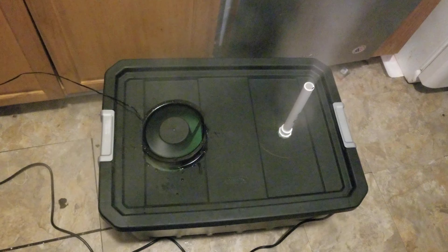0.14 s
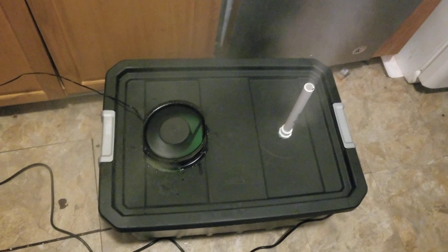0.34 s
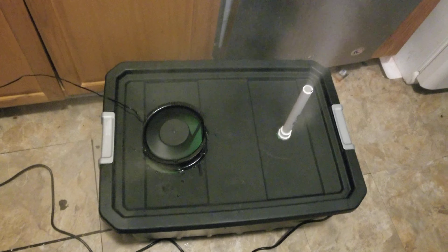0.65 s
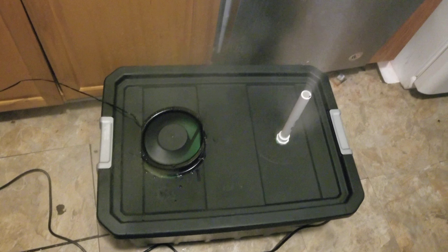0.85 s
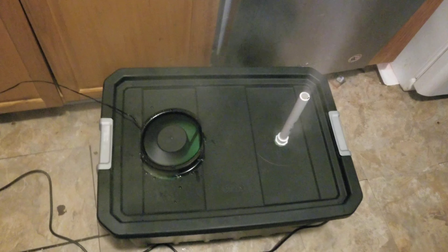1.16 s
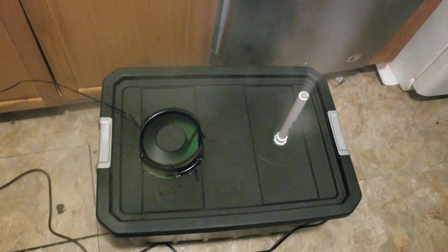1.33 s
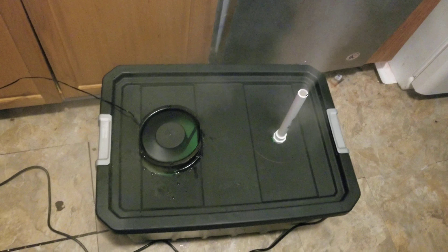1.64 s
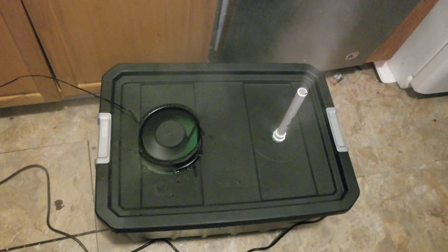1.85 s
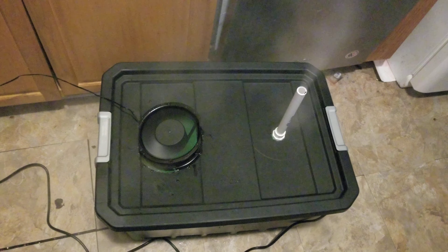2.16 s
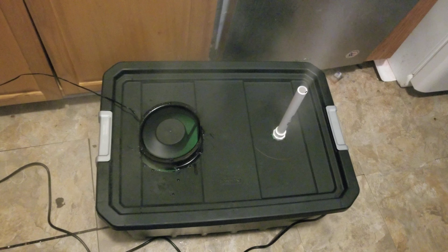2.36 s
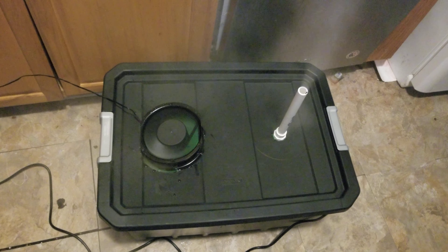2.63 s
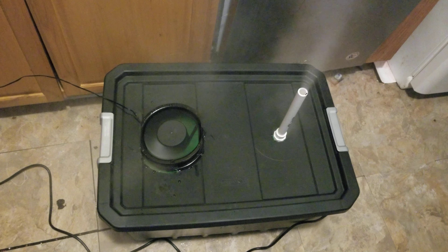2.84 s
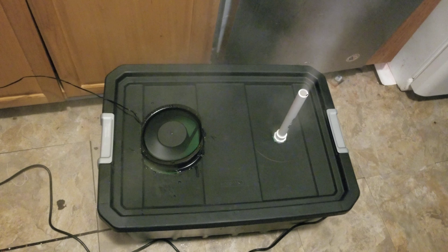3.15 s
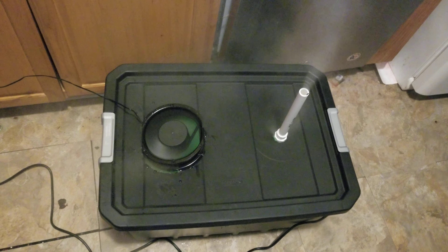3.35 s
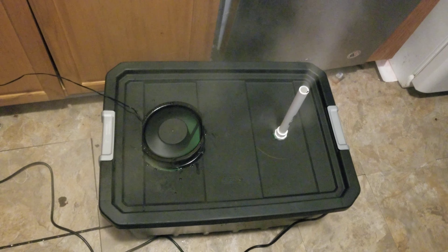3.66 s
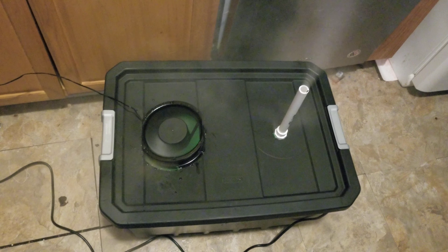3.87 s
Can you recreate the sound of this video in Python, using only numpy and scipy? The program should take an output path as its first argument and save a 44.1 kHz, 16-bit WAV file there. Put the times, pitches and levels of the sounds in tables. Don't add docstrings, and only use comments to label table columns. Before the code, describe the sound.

A small fan drones and whooshes steadily through a plastic box and pipe on a kitchen floor; after brief silence it fades in, and a sharp camera-handling crack snaps before the middle, heard by a handheld camera's microphone.

```python
import sys
import numpy as np
from scipy import signal
from scipy.fft import rfft, irfft
from scipy.io import wavfile

SR = 44100
rng = np.random.default_rng(int(sys.argv[2]) if len(sys.argv) > 2 else 0)


def output_pcm(signal):
    pcm = np.clip(np.atleast_2d(signal).T, -1, 1) * 32767
    wavfile.write(sys.argv[1], SR, np.round(pcm).astype(np.int16))


def linear_from_db(decibels):
    return 10 ** (np.asarray(decibels, float) / 20)


N = 176400


def at_hz(points, hz):
    p = np.array(points)
    return np.interp(np.log(hz + 1), np.log(p[:, 0]), p[:, 1])


def rms_one(x):
    return x / np.sqrt(np.mean(x ** 2) + 1e-20)


def closed(points):
    (low_hz, low_db), (high_hz, high_db) = points[0], points[-1]
    return [(low_hz / 2, low_db - 40)] + list(points) + [(high_hz * 1.3, high_db - 40)]


def colour(x, spectra):
    hz = np.arange(N // 2 + 1) * SR / N
    gains = [linear_from_db(at_hz(closed(s), hz)) for s in spectra]
    return irfft(rfft(x) * gains, N) * np.sqrt(SR / 2)


def drift(rate_hz):
    r = np.exp(-80 * np.pi * rate_hz / SR)
    slow = signal.lfilter([1], [1, -2 * r, r * r], rng.standard_normal(N // 40 + 2002))[2000:]
    return np.interp(np.arange(N) / 40, np.arange(len(slow)), rms_one(slow))


def ring(x, hz, t60):
    r, w = linear_from_db(-60 / (t60 * SR)), 2 * np.pi * hz / SR
    return signal.lfilter([0, np.sin(w)], [1, -2 * r * np.cos(w), r * r], x + 1e-18)


def width_t60(width_hz):
    return np.log(1000) / np.pi / width_hz


def ring_twice(x, hz, width_hz):
    t60 = width_t60(width_hz)
    return rms_one(ring(ring(x, hz, t60), hz, t60))


# pitch_hz, direct share [0-1]
DIRECT_SHARE = [(40, 1), (110, .99), (400, 1), (1200, 0.72), (1650, 0.36), (1900, 0.02), (3000, 0.17),
                (6000, 0)]


def port_noise():
    left_lead_s = 0.00011
    hz = np.arange(N // 2 + 1) * SR / N
    share = np.clip(at_hz(DIRECT_SHARE, hz), 0, 1)
    direct, left, right = rfft(rng.standard_normal((3, N)))
    late = np.exp(-2j * np.pi * hz * left_lead_s)
    direct_pair = direct * [late ** 0, late]
    return irfft(np.sqrt(share) * direct_pair + np.sqrt(1 - share) * np.array([left, right]), N)


# pitch_hz, level_db [dB per Hz]
HUM_SPECTRUM = [(60, -60), (108, -7), (120, -2), (133, -3.5), (246, -4.5), (299, -6), (354, -10),
                (680, -29)]
# pitch_hz, width_hz, level_db [rms]
BOX_RINGS = [(177, 16, -51), (212, 14, -55), (250, 16, -55), (295, 16, -50), (345, 14, -57), (392, 16, -59),
             (440, 18, -61), (477, 22, -59), (532, 18, -62), (590, 22, -66), (720, 40, -63), (830, 40, -67)]
# pitch_hz, width_hz, level_db [rms]
PIPE_RINGS = [(989, 22, -64), (1100, 40, -67), (1216, 30, -65), (1300, 30, -67), (1369, 9, -65),
              (1876, 55, -62), (2174, 40, -67), (2320, 45, -66), (2544, 60, -66), (2834, 70, -67),
              (3145, 70, -70), (5330, 110, -77), (7390, 60, -85)]
# start_s, pitch_hz, level_db
BLADE_TONE_PATH = [(0.5, 129.6, -69), (0.6, 128.9, -60), (0.69, 140.0, -56), (1.11, 142.1, -51.5),
                   (1.26, 134.3, -38.5), (1.52, 133.7, -52.5), (1.71, 127.6, -52), (1.83, 136.6, -37),
                   (1.98, 134.9, -51), (2.13, 134.2, -38.5), (2.26, 135.9, -52), (2.37, 130.7, -58),
                   (2.53, 136.8, -43), (3.16, 127.6, -49), (3.43, 141.0, -47), (3.57, 132.8, -40.5),
                   (3.69, 137.5, -56), (4.0, 131.4, -51)]
# pitch_hz, level_db [dB per Hz]
RUMBLE_SPECTRUM = [(22, -93), (50, -95), (62, -90), (70, -92.5), (88, -78.5), (108, -82.5)]


def box():
    hum = rms_one(colour(port_noise(), [HUM_SPECTRUM, HUM_SPECTRUM]))
    hum = hum * linear_from_db(-44 + 0.27 * drift(2.5)) * linear_from_db([[.3], [-.3]])

    gusts = port_noise(), port_noise()
    blade_mode = (134.5, 10, -54)
    rings = 0
    for k, (hz, width_hz, db) in enumerate([blade_mode] + list(BOX_RINGS) + list(PIPE_RINGS)):
        rings = rings + linear_from_db(db) * rms_one(ring(gusts[k % 2], hz, width_t60(width_hz)))
    rings = signal.sosfilt(signal.butter(8, 112, "high", fs=SR, output="sos"), rings)

    t = np.arange(N) / SR
    s, hz, db = np.transpose(BLADE_TONE_PATH)
    phase = 2 * np.pi * np.cumsum(np.interp(t, s, hz)) / SR
    tone = linear_from_db(np.interp(t, s, db) + 0.5 * drift(4.3)) * np.sin(phase)

    floor = port_noise() + 0.2 * rng.standard_normal((2, N))
    return hum + rings + tone + colour(floor, [RUMBLE_SPECTRUM, RUMBLE_SPECTRUM])


# pitch_hz, level_db [dB per Hz]
RUSH_LEFT = [(400, -76), (650, -83.5), (1300, -82), (1620, -91), (2100, -84), (3000, -89.5), (4300, -91),
             (8300, -108)]
# pitch_hz, level_db [dB per Hz]
RUSH_RIGHT = [(500, -82), (1300, -85.5), (1620, -87), (2100, -82), (3100, -85), (3900, -91.5), (5800, -95),
              (8000, -110)]


def air():
    rush = colour(port_noise(), [RUSH_LEFT, RUSH_RIGHT]) * linear_from_db(0.35 * drift(3.0) + 0.8 * drift(15.0))
    cavity = ring_twice(rng.standard_normal(N), hz=4650, width_hz=600)
    return rush + cavity * linear_from_db(-62 + 2.0 * drift(3.6)) * linear_from_db([[-14.], [0]])


# pitch_hz, level_db [dB per Hz]
CAMERA_LEFT = [(6000, -115), (8500, -106), (11500, -99), (13300, -97), (15500, -91), (17000, -111)]
# pitch_hz, level_db [dB per Hz]
CAMERA_RIGHT = [(6000, -118), (8500, -108), (10500, -102), (12000, -99), (13200, -108), (16000, -116)]


def camera_hiss():
    return colour(port_noise(), [CAMERA_LEFT, CAMERA_RIGHT]) * linear_from_db(0.59 * drift(24.0))


# start_s, level_db [peak], pan_db [left minus right], pitch_hz, grainy tail_s [time to fall
# 30 dB]
SHELL_TICKS = [(0.3977, -40, -7, 3150, 0.0034), (0.638, -46, -7, 3100, .005),
               (.694, -44.5, -2, 3400, 0.0067), (1.132, -47, -4, 4640, .01), (1.316, -38, -6, 4470, 0.0063),
               (1.3166, -41, -2, 2780, 0.0036), (1.317, -52, -3, 9000, 0.0018),
               (1.607, -50, -2, 5500, .004), (1.644, -43, 5, 2200, .003), (2.091, -49.5, 3, 10200, .002),
               (2.298, -51, 3, 4160, 0.007), (2.299, -44.5, 0, 3300, 0.0068), (2.452, -51, 0, 9800, .002),
               (2.452, -49, -2, 4630, .01), (2.473, -51, 3, 11400, .002), (2.485, -52, 3, 11400, .002),
               (2.5951, -44, 3, 3880, 0.0061), (2.973, -49, 8, 12000, .002), (3.059, -47, 2, 3500, 0.0074),
               (3.184, -50, -2, 4680, .01), (3.235, -52, 5, 10100, .002), (3.394, -50, -1, 4530, .015),
               (3.395, -53, 0, 10700, .002), (3.414, -45, -6, 4600, 0.061), (3.414, -54, -2, 8500, .002),
               (3.422, -50.5, 4, 10700, .003), (3.699, -45.5, -9, 4680, 0.018),
               (3.768, -51, 5, 11800, .002), (3.818, -47, -9, 5150, 0.06), (3.83, -48, 12, 14200, .003),
               (3.944, -50, 6, 11000, .003), (3.944, -45, 10, 15000, .002)]


def ticks():
    slip_s, tail_db = .002, -6
    tight_cycles, wide_cycles, wide_db = 22, 4, -2
    out, t = np.zeros((2, N + SR)), np.arange(SR // 20) / SR
    for s, db, pan_db, hz, t60 in SHELL_TICKS:
        grains = rng.standard_normal(len(t)) ** 3 + .8 * rng.standard_normal((2, len(t)))
        slip = grains * (np.exp(-t / slip_s) + linear_from_db(tail_db - 30 * t / t60))
        tight = ring(slip, hz, tight_cycles / hz)
        wide = ring(ring(slip, hz, wide_cycles / hz), hz, wide_cycles / hz)
        wide = np.diff(wide, prepend=0)
        both = tight / abs(tight).max() + linear_from_db(wide_db) * wide / abs(wide).max()
        i = int(s * SR)
        out[:, i:i + len(t)] += both * linear_from_db(db + pan_db * np.array([[.5], [-.5]]))
    return out[:, :N]


# start_s, pitch_hz, level_db [rms]
WHINE_UP = [
    (.435, 13700, -66),
    (.46, 14700, -45),
    (.48, 15200, -48),
    (.505, 15950, -58),
    (.53, 16300, -80),
]
# start_s, pitch_hz, level_db [rms]
WHINE_DOWN = [
    (0.729, 15900, -66),
    (.75, 15000, -50),
    (.772, 14500, -50),
    (.79, 13100, -72),
    (.808, 11800, -74),
]
# pitch_hz, level_db
WHINE_RIGHT_GAIN = [(11800, 4), (13200, -5), (15000, -14), (16000, -17)]


def motor_whine():
    out, t = np.zeros((2, N)), np.arange(N) / SR
    for glide in (WHINE_UP, WHINE_DOWN):
        s, hz, db = np.transpose(glide)
        pitch_hz = np.interp(t, s, hz)
        phase = 2 * np.pi * np.cumsum(pitch_hz + 160 * drift(200.0)) / SR
        level = linear_from_db(np.interp(t, s, db, left=-200, right=-200) + 2.5 * drift(80.0))
        port_gain = linear_from_db([0 * t, at_hz(WHINE_RIGHT_GAIN, pitch_hz)])
        out = out + np.sqrt(2) * level * np.sin(phase) * port_gain
    return out


# [dB per Hz, relative]
EFFORT_LEFT = [(2500, -16), (3300, 0), (4700, -10), (9500, -26), (11300, -5), (12800, -12), (14500, 1),
               (15600, -12)]
# [dB per Hz, relative]
EFFORT_RIGHT = [(2500, -14), (3300, 0), (4700, 0), (7000, -20), (9500, -14), (11900, 0), (13100, -16),
                (15000, -26)]
# pitch_hz, width_hz, pan_db [left minus right]
MOTOR_WHISTLES = [(11400, 1300, 11), (14500, 440, 12)]
# start_s, length_s, hiss level_db, lower whistle level_db, upper whistle level_db
MOTOR_RUNS = [
    (0.454, 0.39, -60, -63, -57),
    (1.007, 0.31, -56, -62.5, -74),
    (1.275, 0.19, -59, -75, -77),
    (2.326, 0.22, -63, -63, -59),
    (2.93, 0.19, -58.5, -72, -80),
    (3.366, 0.17, -60, -79, -74),
    (3.66, 0.51, -65, -74, -76),
]


def motor_runs():
    t = np.arange(N) / SR
    levels = 0
    for s, length_s, *db in MOTOR_RUNS:
        from_edge_s = np.minimum(t - s, s + length_s - t)
        levels = levels + linear_from_db(db)[:, None] * np.clip(from_edge_s / (.3 * length_s), 0, 1)
    swell, *whistle_levels = levels
    out = swell * linear_from_db(2.0 * drift(19.0)) * rms_one(colour(port_noise(), [EFFORT_LEFT, EFFORT_RIGHT]))
    for level, (hz, width_hz, pan_db) in zip(whistle_levels, MOTOR_WHISTLES):
        whistle = ring_twice(port_noise(), hz, width_hz) * linear_from_db([[0], [-pan_db]])
        out = out + level * linear_from_db(2.0 * drift(30.0)) * whistle
    return out


def gear_grind():
    start_s, length_s = .56, .27
    t = np.arange(N) / SR
    swell = np.sin(np.pi * np.clip((t - start_s) / length_s, 0, 1))
    return swell * linear_from_db(-58.5 + 3.0 * drift(40.0)) * ring_twice(port_noise(), hz=3300, width_hz=500)


# start_s, left level_db, right level_db, dullness [dB lost per octave]
CRACK_SLIPS = [
    (1.6314, -20, -16, 1),
    (1.6321, -17, -22, 5),
    (1.63292, -8, -15, 1),
    (1.63330, -1, -10, 0),
    (1.63382, -19, -9, 4),
    (1.6344, -12, -22, 5),
]
# pitch_hz, left level_db, right level_db, t60_s
SHELL_MODES = [(1900, -28, -30, .0015), (2750, -7, -6, .002), (3250, -7, -3, .003), (3950, -8, -5, .003),
               (4720, -3, -6, .003), (6200, -14, -12, .001), (8300, -5, -7, .001), (10600, -3, -1, .001),
               (14500, -15, -30, .001)]
# pitch_hz, level_db, t60_s
BODY_MODES = [(336, -16.5, 0.017), (497, -16.5, 0.019), (780, -16, 0.016), (1260, -16.5, 0.01)]


def crack():
    s, *db, dull_db = np.transpose(CRACK_SLIPS)
    db = np.array(db)
    at = (s * SR).astype(int)
    shell = 0
    for hz, left_db, right_db, t60 in SHELL_MODES:
        clicks = np.zeros((2, N))
        octaves = np.log2(hz / SHELL_MODES[1][0])
        clicks[:, at] = linear_from_db(db - dull_db * octaves + rng.standard_normal((2, len(s))))
        shell = shell + ring(clicks, hz, t60) * linear_from_db([[left_db], [right_db]])
    shell = signal.sosfilt(signal.butter(2, 1300, "high", fs=SR, output="sos"), shell)

    body_late_s = .0005
    main = np.argmax(db[0])
    hits = np.zeros((2, N))
    hits[:, at[main] + int(body_late_s * SR)] = -linear_from_db(db[:, main])
    body = 0
    for k, (hz, mode_db, t60) in enumerate(BODY_MODES):
        body = body + linear_from_db(mode_db) * ring(hits, hz, t60) * (-1) ** k
    body = signal.lfilter(*signal.butter(2, 300, "high", fs=SR), body)
    return linear_from_db(-6) * shell + linear_from_db(-4.5) * body


def push():
    start_s, pitch_hz, right_late_s = 1.6345, 90, .002
    click = np.zeros(N)
    click[int(start_s * SR)] = 1
    soft = signal.lfilter(*signal.butter(2, 160, fs=SR), click)
    knock = ring(soft, pitch_hz, t60=0.15)
    knock = signal.lfilter(*signal.butter(2, pitch_hz / 2, "high", fs=SR), knock)
    knock = linear_from_db(-32.5) * knock / abs(knock).max()
    return np.array([knock * linear_from_db(-3.0), np.roll(knock, int(right_late_s * SR))])


def scene():
    fan = box() + air()
    camera = camera_hiss() + ticks() + motor_whine() + motor_runs() + gear_grind()
    return fan + camera + crack() + push()


def low_pass(x):
    return signal.sosfilt(signal.butter(12, 17010, fs=SR, output="sos"), x)


def record(dry):
    start_s, step_db, rise_s = 0.35, -28.5, 0.13
    bass_hz, bass_late_share, bass_rise_s = 132, .8, 0.37
    since = np.maximum(np.arange(N) / SR - start_s, 0)
    bass = signal.sosfiltfilt(signal.butter(2, bass_hz, fs=SR, output="sos"), dry)
    opened = dry - bass_late_share * np.exp(-since / bass_rise_s) * bass
    gain = linear_from_db(step_db * np.exp(-since / rise_s)) * np.clip(since / .006, 0, 1)
    limited = 2 * np.tanh(opened * gain / 2)
    band_edge = signal.cheby2(16, 45, 15950, fs=SR, output="sos")
    return low_pass(signal.sosfilt(band_edge, limited))


dry = scene()
out = record(dry)
output_pcm(out)
```